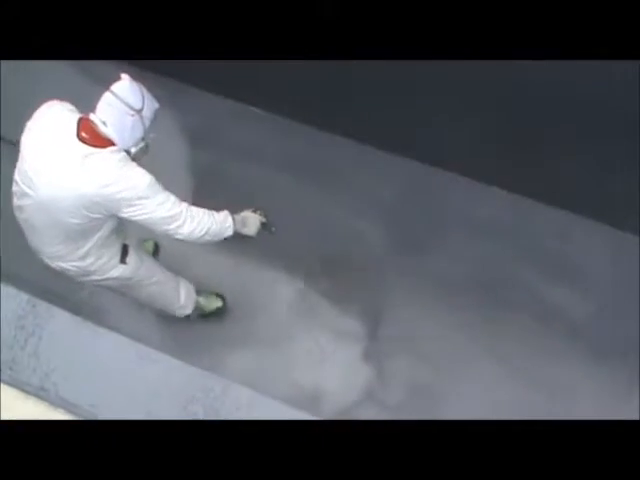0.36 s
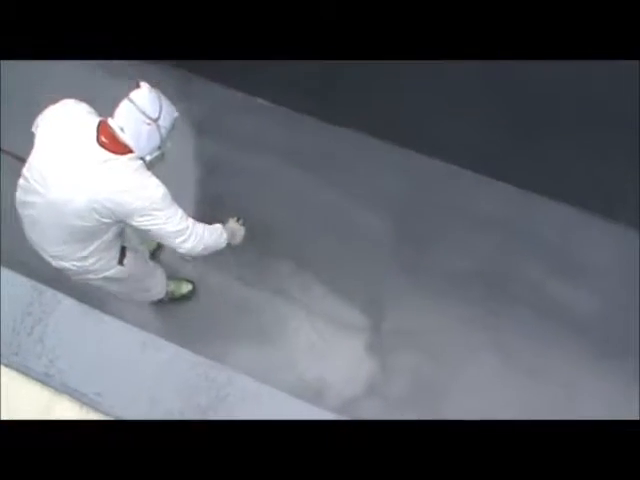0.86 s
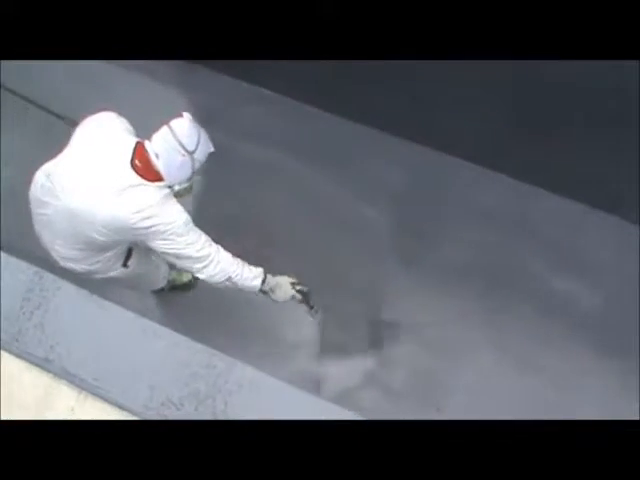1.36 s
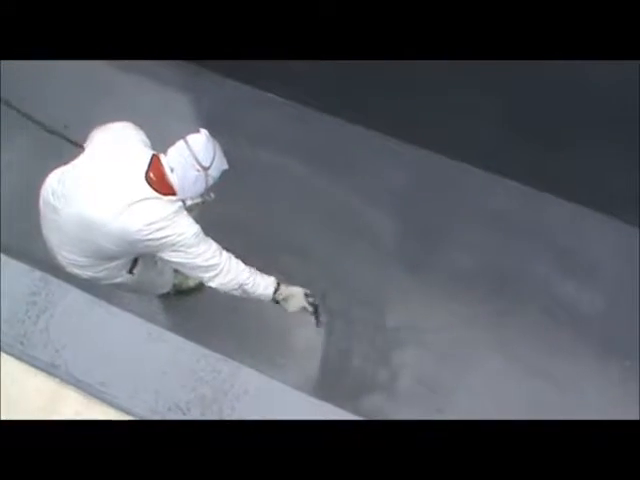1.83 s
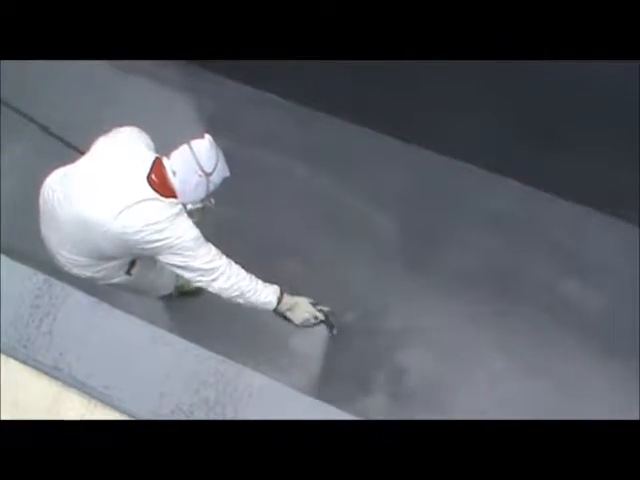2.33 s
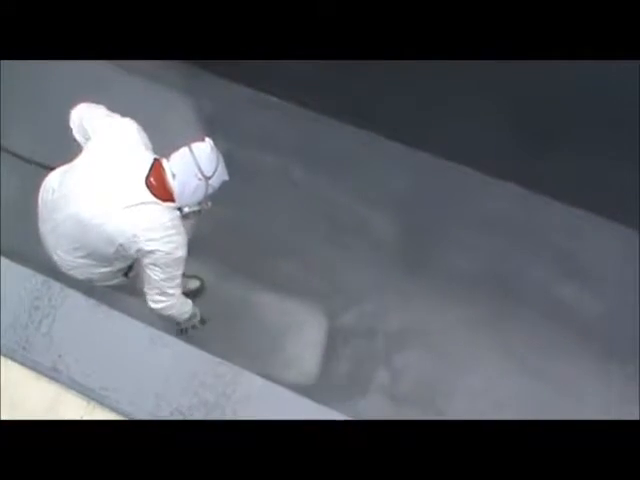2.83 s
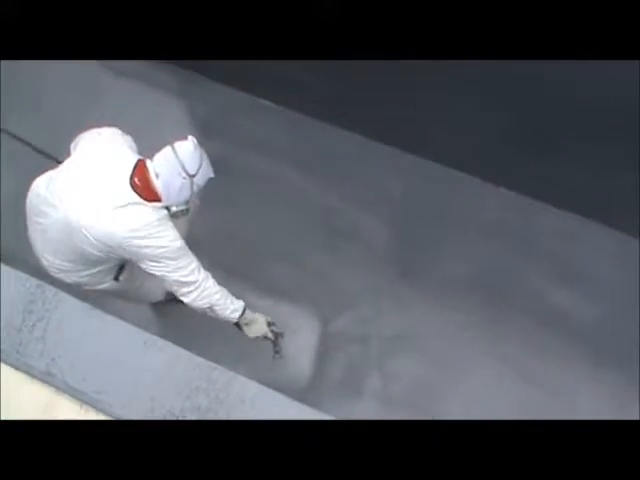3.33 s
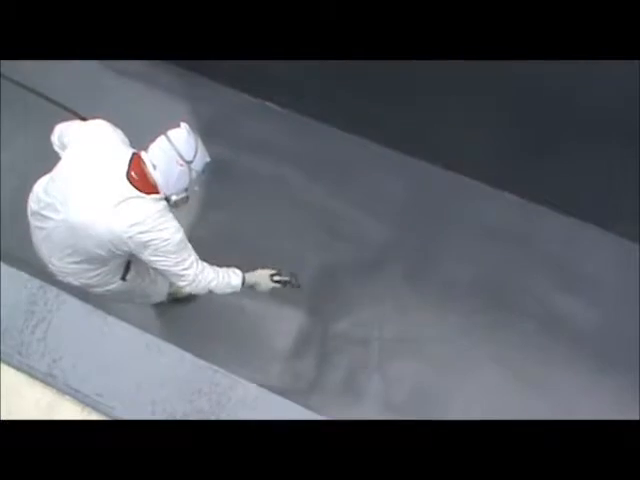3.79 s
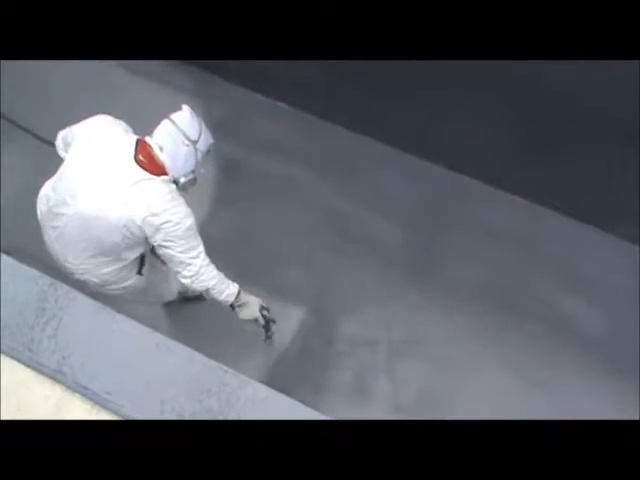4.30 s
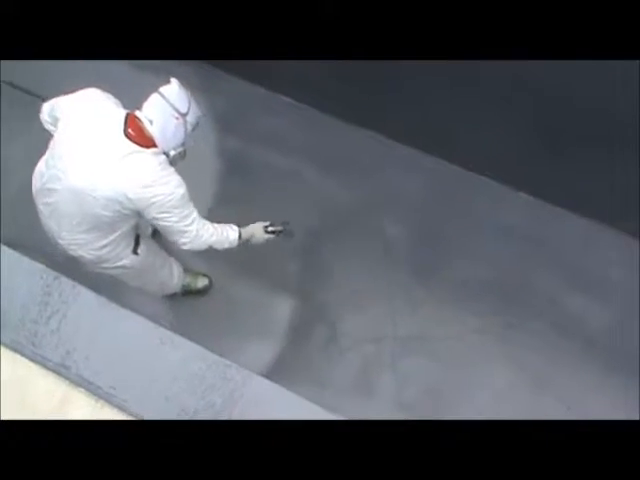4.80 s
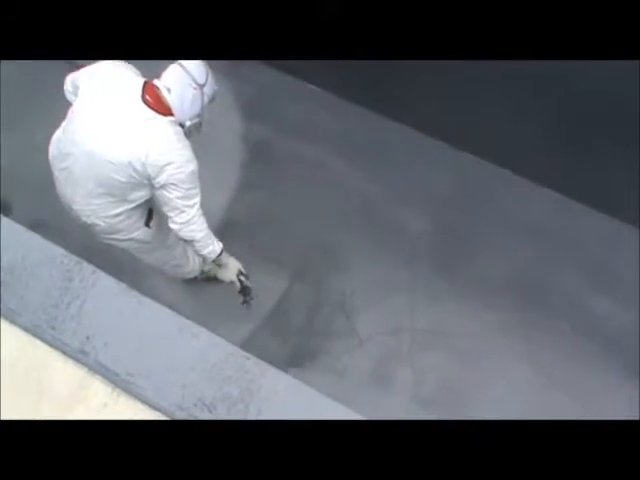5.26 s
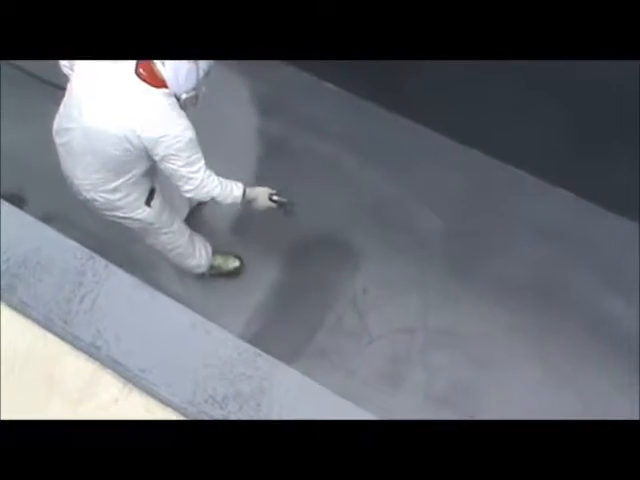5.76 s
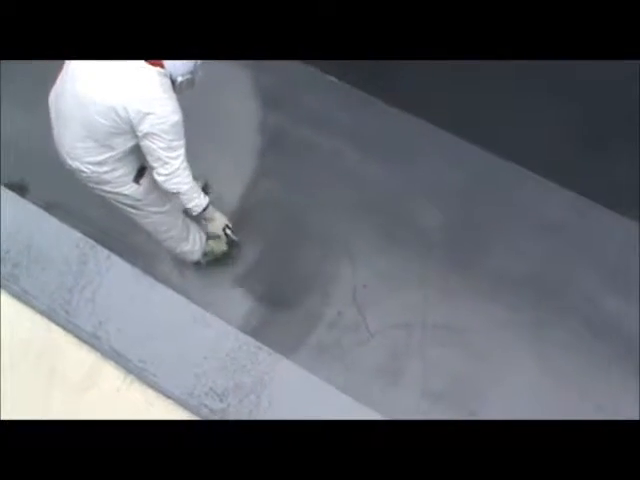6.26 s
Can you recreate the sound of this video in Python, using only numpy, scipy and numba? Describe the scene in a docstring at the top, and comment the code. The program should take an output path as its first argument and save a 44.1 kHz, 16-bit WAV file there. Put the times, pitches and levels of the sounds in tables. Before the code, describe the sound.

From the first moment a spray gun hisses brightly and steadily, a fine high sizzle with a slightly lower, fizzy splash on concrete, gently rising and falling as it sweeps. Underneath are a low engine hum, a faint wavering motor whine and soft broad rumble. At about 0.4 s an air pump reverses: a short dull knock, then a loud rush of escaping air lasting roughly a third of a second, darkening and dropping away quickly. The same happens at 2.7 s and, strongest, at 5.1 s. Each time the camera's level ducks and the bass thins briefly before recovering. The spray stops for about a tenth of a second at 2.3 s and 3.3 s, leaving the rumble exposed; that rumble swells around 2.5 s. A faint, short, blurred mid-pitched hoot comes at 5.8 s. Hissing continues to the end, around 6.5 s, with slight hard-surfaced outdoor echo.

```python
"""A hand-held spray gun hisses over concrete, over the hum of an engine, an electric motor and a rumbling site.
At 0.4, 2.7 and 5.1 s the air-driven pump reverses: resonances knock, then a puff of filtered noise escapes.
Each rush of exhaust makes the camera lower its gain and cut the bass for a moment.
The trigger is let go for an instant at 2.3 and 3.3 s; the rumble swells around 2.5 s.
A short blurred tone sounds at 5.8 s. Hiss and splash are patchy noise, the machines are wavering sines."""
import sys
import numpy as np
from scipy import signal
from scipy.fft import rfft, irfft, next_fast_len
from scipy.io import wavfile
from scipy.ndimage import uniform_filter1d, map_coordinates
from numba import njit

SR = 44100
rng = np.random.default_rng(int(sys.argv[2]) if len(sys.argv) > 2 else 0)


def pcm_store(signal):
    """Save signal as 16-bit PCM."""
    levels = np.round(np.clip(np.atleast_2d(signal), -1, 1) * 32767)
    wavfile.write(sys.argv[1], SR, levels.astype(np.int16).T)


def voltage_ratio(decibels):
    """Convert decibels (scalar or array-like) to amplitude ratios, 20 dB per decade."""
    exponent = np.asarray(decibels, float) / 20
    return 10 ** exponent


N = 292383

# Reversals of the pump: start_s, knock_db, exhaust_db, valve_shuts_after_s
PUMP_STROKES = [(0.418, -54, -41.5, 0.33), (2.687, -52, -42, 0.35), (5.059, -53, -39.5, .37)]


def unit(x):
    """Scaled to rms 1."""
    return x / np.sqrt(np.mean(x ** 2) + 1e-20)


def along(points, hz):
    """Reads a curve of (Hz, value) points on a log frequency axis."""
    point_hz, value = np.transpose(points)
    return np.interp(np.log(hz + 1), np.log(point_hz + 1), value)


def curves(rows):
    """One value per sample for each column after the time."""
    time_s, *columns = np.transpose(rows)
    return [np.interp(np.arange(N) / SR, time_s, column) for column in columns]


def wobble(rate):
    """A smooth random curve, rate knots a second."""
    knots = rng.standard_normal(int(N * rate / SR) + 4)
    return map_coordinates(knots, [np.arange(N) * rate / SR])


def filtered(x, response):
    """x times a complex response of frequency."""
    size = next_fast_len(N + 8192)
    spectrum = rfft(x, size) * response(np.fft.rfftfreq(size, 1 / SR))
    return irfft(spectrum, size)[..., :N]


def rush(spectrum, patchy_db, alike=1):
    """Stereo noise, mid at rms 1, with patches of random gain over time and frequency."""
    # Likeness of left and right: pitch_hz, correlation (no unit)
    likeness = [(60, 0.91), (300, 0.85), (1100, 0.78), (1450, 0.97), (5000, 1), (6500, 0.86), (9800, 0.9),
                (12500, 0.8), (15500, 0.62)]
    z = signal.stft(rng.standard_normal((2, N)), nperseg=512)[2]
    field = rng.standard_normal(z.shape[1:])
    field = uniform_filter1d(uniform_filter1d(field, size=6, axis=0), size=10, axis=1)
    pair = signal.istft(z * voltage_ratio(patchy_db * unit(field)), nperseg=512)[1][:, :N]

    def mid_side(hz):
        turn = np.arccos(np.clip(alike * along(likeness, hz), -1, 1)) / 2
        return voltage_ratio(along(spectrum, hz)) * [np.cos(turn), np.sin(turn)]

    mid, side = filtered(pair, mid_side)
    return np.array([mid + side, mid - side]) / np.std(mid)


def tone(hz):
    """A sine of rms 1 that follows a pitch curve from a random phase."""
    cycles = np.cumsum(hz + np.zeros(N)) / SR
    return np.sqrt(2) * np.sin(2 * np.pi * (cycles + rng.random()))


def site():
    """Broad rumble and far hiss are shaped noise; a low band swells for a moment."""
    # Colour of the site: pitch_hz, density_db (per Hz, relative)
    site_color = [(25, -19), (50, -6), (120, -0.5), (250, -5.5), (450, -10.5), (780, -12), (920, -8),
                  (1100, -11.5), (2000, -12.5), (5000, -16), (12000, -23.5), (16000, -26)]
    # The swell of rumble: peak_s, pitch_hz, width_hz, level_db, width_s
    swell = (2.5, 190, 60, -69, 0.4)
    peak_s, hz, width_hz, level_db, width_s = swell
    band = unit(filtered(rng.standard_normal(N), lambda f: np.exp(-((f - hz) / width_hz) ** 2)))
    from_peak = (np.arange(N) / SR - peak_s) / width_s
    surge = voltage_ratio(level_db) * np.exp(-from_peak ** 2) * band
    return voltage_ratio(-59 + 0.45 * wobble(2.962)) * rush(site_color, patchy_db=1.2) + surge


def machines():
    """Engine orders follow its speed; motor and mains tones waver in level and slightly around a fixed pitch."""
    # Engine speed and level: time_s, firing_hz, level_db
    engine_run = [(0.1, 71, -63), (1.05, 72.86, -63.3), (1.6, 72.84, -60.5), (2.55, 71.4, -62),
                  (3.3, 72.16, -64), (3.7, 71.9, -61), (4.5, 71.44, -63.5), (5.7, 70.66, -61.5),
                  (6.5, 71.35, -63)]
    # Engine partials: multiple (of the firing rate), relative_db
    engine_orders = [(1, 0.5), (2, -17), (4.19, -12.5)]
    # Motor whine: time_s, level_db
    whine_run = [(0.1, -73), (0.35, -72), (1.8, -75.5), (2.2, -79), (2.55, -71), (3.3, -74), (3.7, -76),
                 (4.1, -72), (4.9, -69.5), (5.7, -78), (6.5, -75)]
    # Steady tones of motor and mains: pitch_hz, level_db, waver_db
    hum_tones = [(59.9, -70.5, 0.5), (117.8, -83, 5), (124.6, -76.5, 3), (180, -77.5, 4.5),
                 (364, -83.5, 1.5)]
    # One short blurred tone: peak_s, pitch_hz, level_db, width_s
    hoot_tone = (5.81, 645, -63.5, .05)

    firing_hz, engine_db = curves(engine_run)
    whine_db, = curves(whine_run)
    engine = 0
    for multiple, db in engine_orders:
        level = voltage_ratio(engine_db + db + 0.38 * multiple * wobble(6.5))
        engine = engine + level * tone(multiple * firing_hz * (1 + .002 * wobble(8.98)))
    hum = 0
    for hz, db, waver_db in hum_tones:
        hum = hum + voltage_ratio(db + waver_db * wobble(5)) * tone(hz * (1 + 0.004 * wobble(12)))
    whine = voltage_ratio(whine_db + 4 * wobble(22)) * tone(527 * (1 + .014 * wobble(35)))  # around 527 Hz

    peak_s, hz, db, width_s = hoot_tone
    from_peak = (np.arange(N) / SR - peak_s) / width_s
    hoot = voltage_ratio(db) * np.exp(-from_peak ** 2) * tone(hz * (1 + .05 * wobble(90)))
    return engine + hum + whine + hoot


def pump():
    """At each reversal the valve knocks, then the cylinder empties, its hiss growing darker as pressure falls."""
    # Exhaust at full pressure: pitch_hz, density_db (per Hz, relative)
    blast_color = [(300, -39), (800, -19), (1570, -16.5), (3150, -1.5), (4730, -1), (6200, -2.5),
                   (7750, -8.5), (11000, -15), (16000, -32)]
    # Exhaust as the pressure sinks: pitch_hz, density_db (per Hz, relative)
    sigh_color = [(300, -34), (600, -17), (900, -11), (1400, -8), (2300, -3), (3300, -2), (4600, -2),
                  (6200, -4), (7500, -10.5), (11000, -11), (16000, -34)]
    # Knock resonances: pitch_hz, width_hz, relative_db
    valve_modes = [(734, 340, 2), (1300, 730, 2), (2500, 810, -3)]
    sag_db_per_s, fall_db_per_s = 9.5, 76  # fading from the start, and the extra fall once the valve shuts

    t, knock, blast, sigh = np.arange(N) / SR, np.zeros(N), np.zeros(N), np.zeros(N)
    for start_s, knock_db, exhaust_db, shut_s in PUMP_STROKES:
        since_s = np.clip(t - start_s, 0, None)
        knock += voltage_ratio(knock_db - 310 * since_s) * np.clip(since_s / 0.0047, 0, 1)
        sinking_db = sag_db_per_s * since_s + fall_db_per_s * np.clip(since_s - shut_s, 0, None)
        opening = 1 - np.exp(-np.clip(since_s - .004, 0, None) / 0.021)
        push = voltage_ratio(exhaust_db - sinking_db) * opening
        late = np.clip(since_s / .22, 0, 1)  # equal-power fade from blast to sigh
        blast += push * np.sqrt(1 - late)
        sigh += push * np.sqrt(late)

    def body(f):
        total = 0
        for k, (center, width, db) in enumerate(valve_modes):
            resonance = 1j * f * width / (center * center - f * f + 1j * f * width)
            total = total + (-1) ** k * voltage_ratio(db) * resonance  # neighbours in opposite polarity
        return total

    knock = knock * unit(filtered(rng.standard_normal(N), body))
    gust = voltage_ratio(0.28 * wobble(40))
    exhaust = blast * rush(blast_color, patchy_db=1.8, alike=0.79)
    exhaust = exhaust + sigh * rush(sigh_color, patchy_db=-0.2, alike=0.9)
    return knock + gust * exhaust


def yard(x, shared=.8):
    """Walls and floor answer; each frequency dies at its own speed, and both ports share most of the echo."""
    # Decay of the echo: pitch_hz, t60_s
    decay = [(1000, 0.6), (6000, 0.21), (15000, 0.12)]
    hz, t, z = signal.stft(rng.standard_normal((3, SR // 2)), SR, nperseg=256)
    fade = voltage_ratio(-60 * t / along(decay, hz)[:, None])
    tails = signal.istft(z * fade, SR, nperseg=256)[1]
    share = np.clip(shared, 0, 1)
    tail = np.sqrt(share) * tails[2] + np.sqrt(1 - share) * tails[:2]
    return signal.fftconvolve(x, tail / np.linalg.norm(tail[0]), axes=1)[:, :N]


def spray():
    """The jet tears at the nozzle and splashes on the slab; the flow dies away when the trigger is let go."""
    # The gun sweeping to and fro: time_s, nozzle_hiss_db
    sweep = [(0, -46.5), (0.37, -45.5), (1.18, -46), (1.3, -45), (1.8, -45.5), (2.25, -45.5), (2.64, -45.5),
             (3.48, -46), (3.9, -44), (4.1, -47), (4.42, -44), (4.8, -46.5), (5.0, -44), (5.8, -45.5),
             (6.05, -44.5), (6.3, -46), (6.6, -44)]
    # Pauses of the trigger: let_go_s, pulled_again_s
    trigger = [(2.326, 2.426), (3.261, 3.361)]
    # Colour of the nozzle hiss: pitch_hz, density_db (per Hz, relative)
    nozzle_color = [(4500, -30), (6500, -10), (8000, -4.5), (10000, -0.5), (11900, -2.5), (13600, -6.5),
                    (15100, -7.5), (16000, -20.5)]
    # Colour of the splash: pitch_hz, density_db (per Hz, relative)
    splash_color = [(900, -38), (1500, -15.5), (2300, -9.5), (3100, -8), (4700, -1), (5800, 1.5),
                    (7000, -2), (8500, -14.5)]
    splash_db, splash_drift_db = -51.5, .5
    dip_depth_db, dip_delay_s = 1.5, 0.15  # deepest sag of the hiss, this long after each reversal

    hiss_db, = curves(sweep)
    t, flow = np.arange(N) / SR, np.ones(N)
    for let_go_s, pulled_s in trigger:
        dying = voltage_ratio(-210 * np.clip(t - let_go_s, 0, 1))
        flow *= np.maximum(dying, np.clip((t - pulled_s) / .011, 0, 1))

    since = np.clip(t - np.array(PUMP_STROKES)[:, :1], 0, None) / dip_delay_s
    dip_db = dip_depth_db * np.sum(since * np.exp(1 - since), axis=0)
    flutter_db = 0.34 * wobble(6.4) + 0.23 * wobble(30)  # the fan of droplets is never quite even
    hiss = voltage_ratio(hiss_db - dip_db + flutter_db) * rush(nozzle_color, patchy_db=0.87)
    splash_level = voltage_ratio(splash_db + splash_drift_db * wobble(3.8) + flutter_db)
    splash = splash_level * rush(splash_color, patchy_db=0.85)
    jet = flow * (hiss + splash)
    return jet + voltage_ratio(-14.0) * yard(jet)


def scene():
    """All sources, left and right."""
    return site() + machines() + pump() + spray()


def lagging(x, seconds):
    """A running mean that forgets over the given time."""
    forget = np.exp(-1 / (seconds * SR))
    return signal.lfilter([1 - forget], [1, -forget], x - x[0]) + x[0]


@njit
def follow(level_db, attack, release):
    """Chases a rising level quickly and sinks back slowly."""
    held = level_db.copy()
    for i in range(1, len(held)):
        gap = level_db[i] - held[i - 1]
        held[i] = held[i - 1] + (attack if gap > 0 else release) * gap
    return held


def low_cut(x, knee_db=-55, depth=1.8, edge_hz=620, most_db=11, wait_s=0.012, back_s=0.089):
    """A sudden rise of the middle band cuts the bass after a short wait, until the circuit is used to the level."""
    middle = filtered(np.mean(x, axis=0), lambda hz: (hz > 1500) & (hz < 4000))
    power = lagging(middle ** 2, seconds=0.0071)
    level_db = np.maximum(10 * np.log10(power + 1e-12), knee_db)
    rise_db = np.clip(level_db - lagging(level_db, seconds=0.085), 0, None)
    cut_db = follow(np.minimum(depth * rise_db, most_db), 1 / (.004 * SR), 1 / (back_s * SR))
    cut_db = np.pad(cut_db, (int(abs(wait_s) * SR), 0))[:N]
    bass = filtered(x, lambda hz: 1 / (1 + (hz / edge_hz) ** 6))
    return x - bass * (1 - voltage_ratio(-cut_db))


def gain_control(x, ceiling_db=-44, grip=0.7, attack_s=0.0022, release_s=0.086):
    """Whatever rises over the ceiling is pulled back, and all else with it."""
    power = lagging(np.mean(x ** 2, axis=0), seconds=0.012)
    over_db = np.clip(10 * np.log10(power + 1e-12) - ceiling_db, 0, None)
    held_db = follow(over_db, 1 / (attack_s * SR), 1 / (release_s * SR))
    return x * voltage_ratio(-np.clip(grip, 0, 1) * held_db)


def top_cut(x):
    """Nothing passes above the cut-off."""
    return signal.sosfilt(signal.butter(12, 17070, fs=SR, output="sos"), x)


def record(dry):
    """Two close microphone ports differ in phase and level; low cut and gain control follow."""
    # Phase by which left leads: pitch_hz, lead_rad
    lead = [(60, -0.45), (300, -0.99), (600, -0.94), (1100, -0.29), (1400, 0), (15000, 0)]
    # Balance of the ports: pitch_hz, left_minus_right_db
    tilt = [(60, -2.5), (300, -2.4), (1300, -0.1), (6000, 0.4), (15000, -1)]
    half = np.array([[.5], [-.5]])  # each port takes half of the difference

    def port_response(hz):
        level = voltage_ratio(half * along(tilt, hz))
        phase = np.exp(1j * half * along(lead, hz))
        return (hz < 15770) * level * phase  # nothing passes above 15770 Hz

    ports = filtered(dry, port_response)
    mix = gain_control(low_cut(ports))
    return top_cut(mix)


dry = scene()
out = record(dry)
pcm_store(out)
```